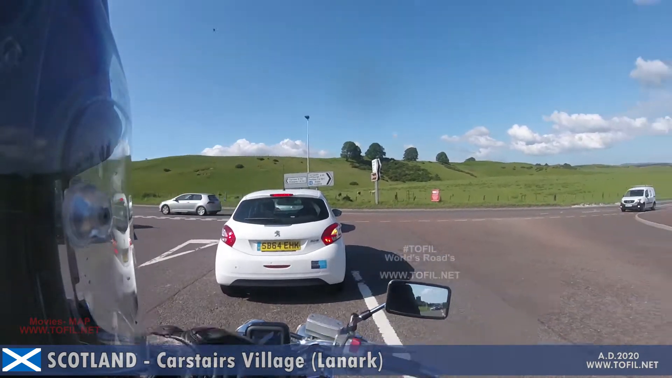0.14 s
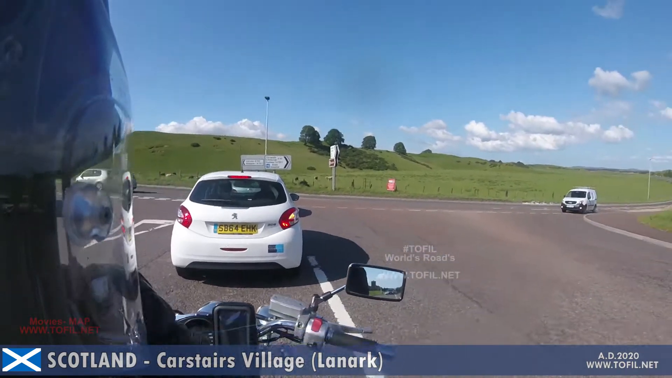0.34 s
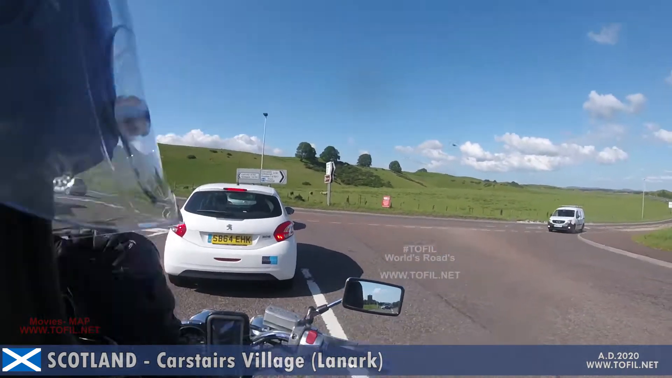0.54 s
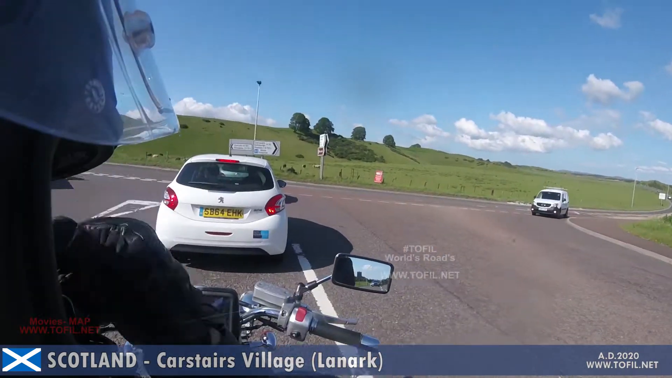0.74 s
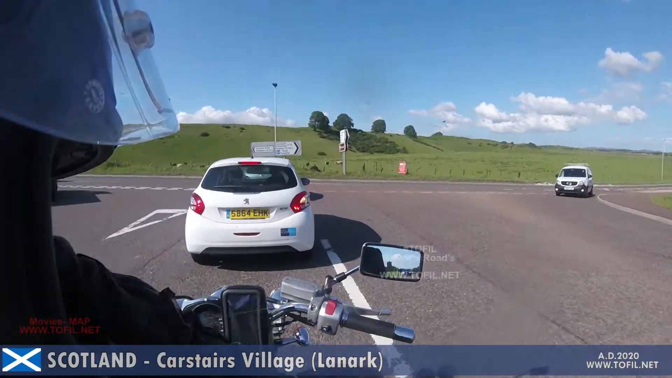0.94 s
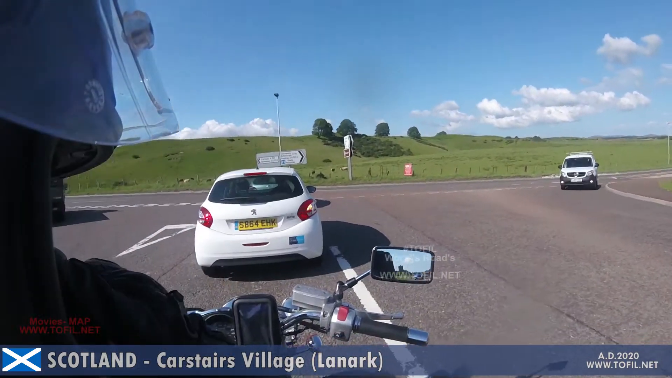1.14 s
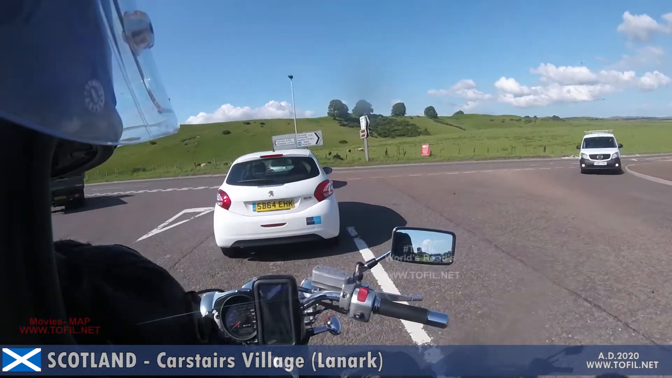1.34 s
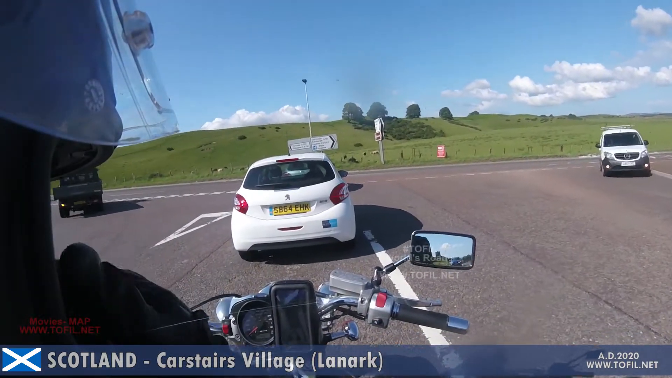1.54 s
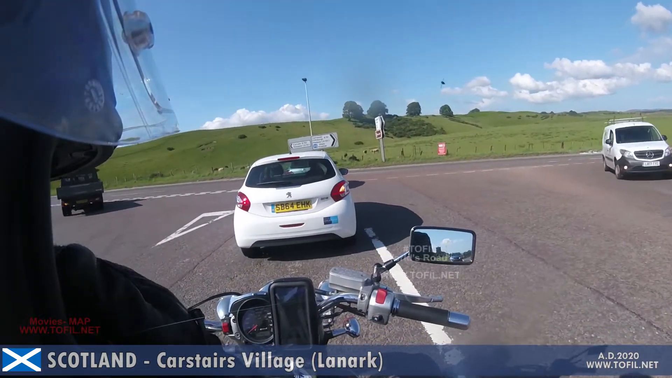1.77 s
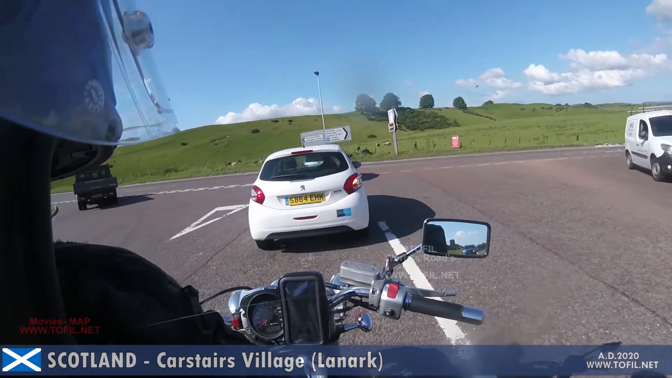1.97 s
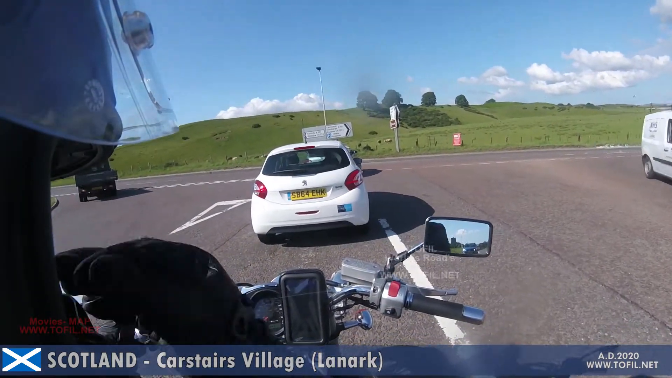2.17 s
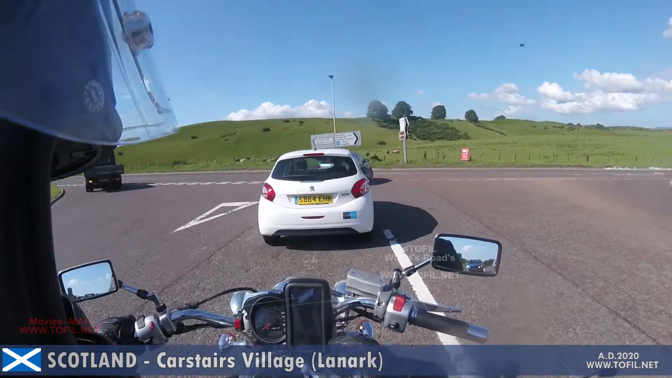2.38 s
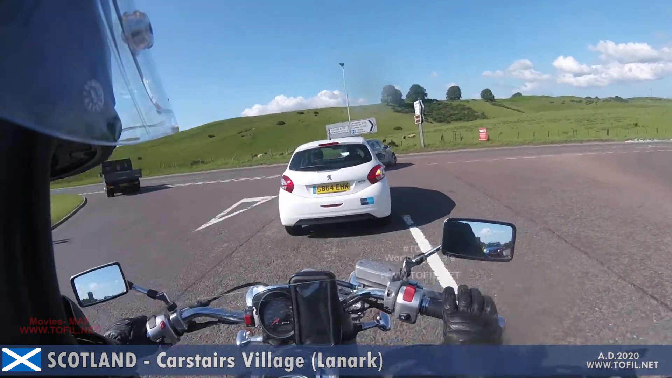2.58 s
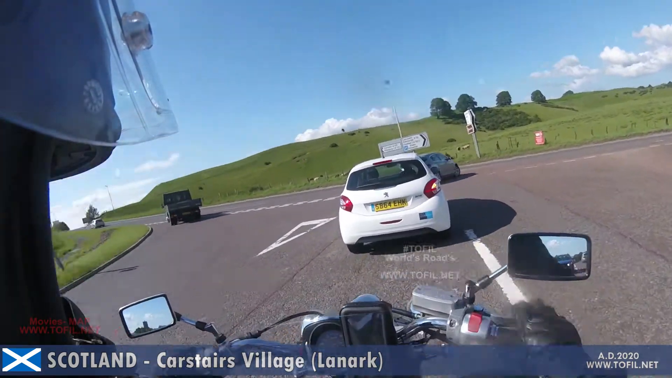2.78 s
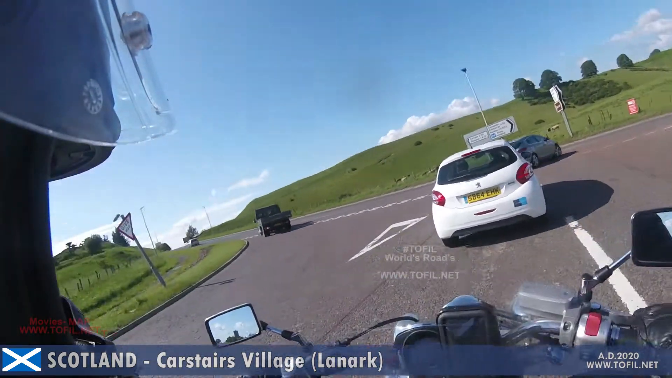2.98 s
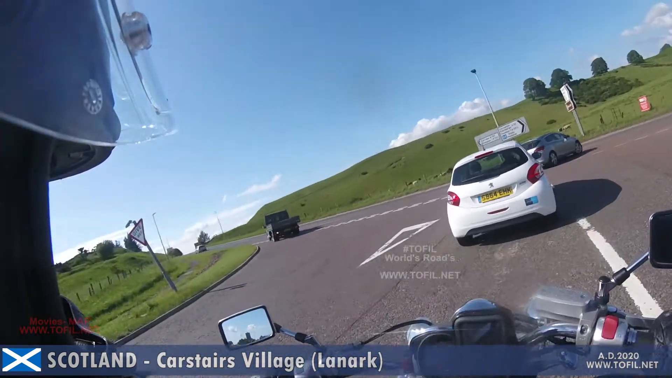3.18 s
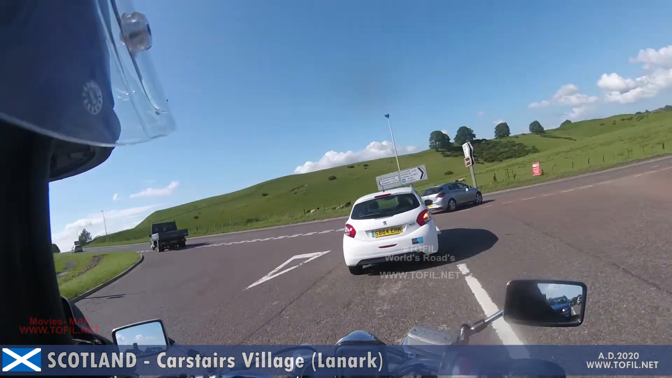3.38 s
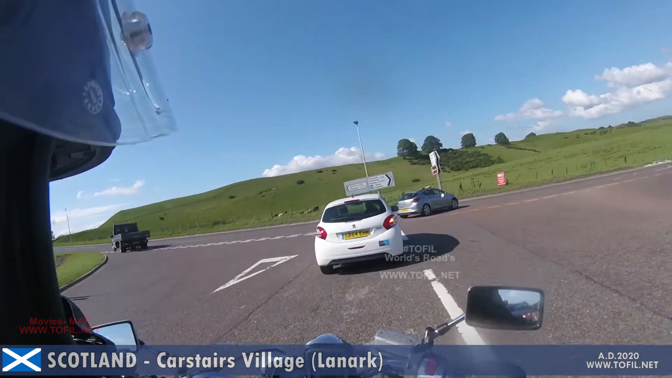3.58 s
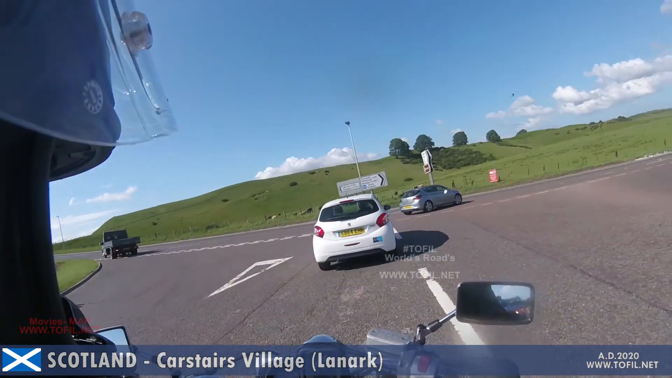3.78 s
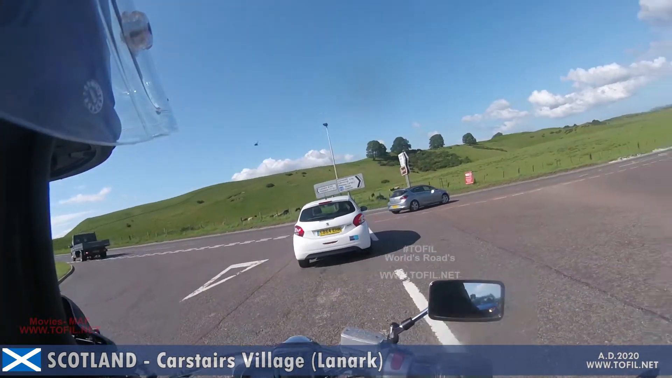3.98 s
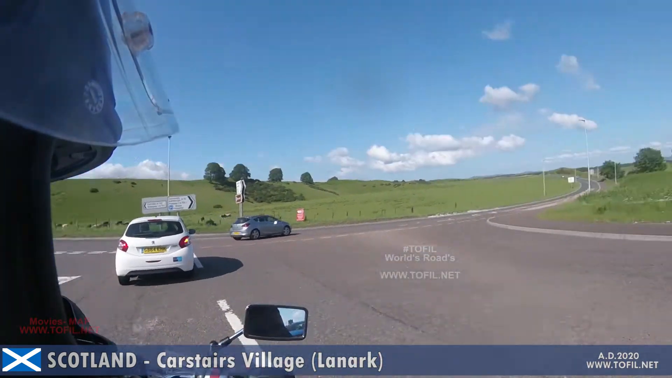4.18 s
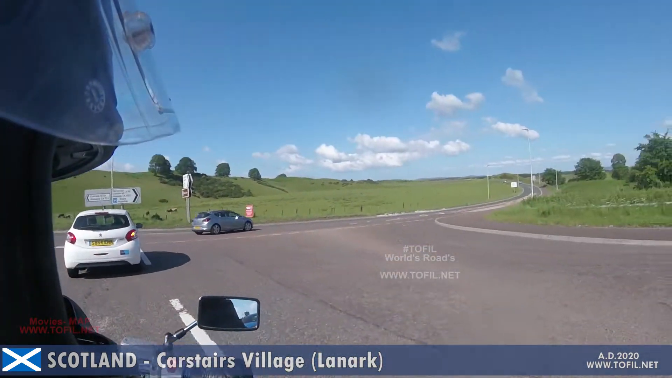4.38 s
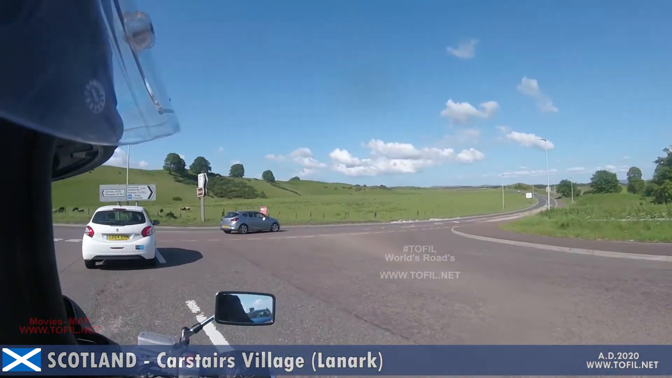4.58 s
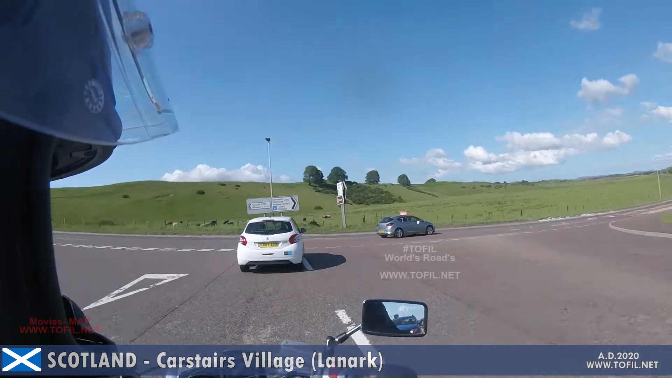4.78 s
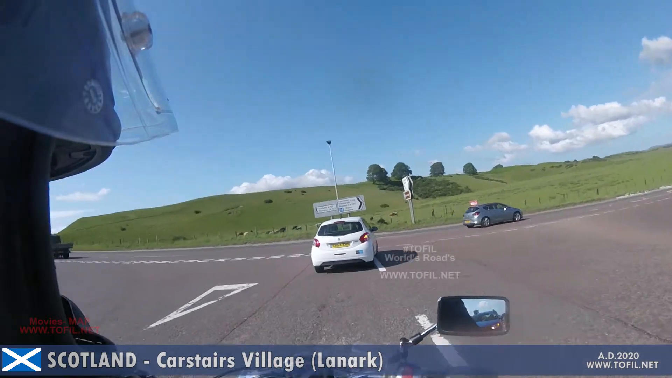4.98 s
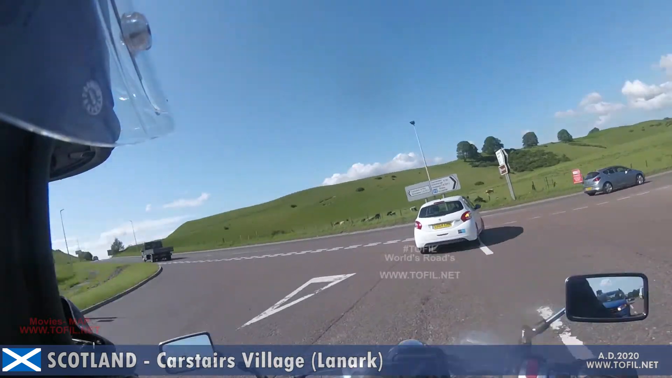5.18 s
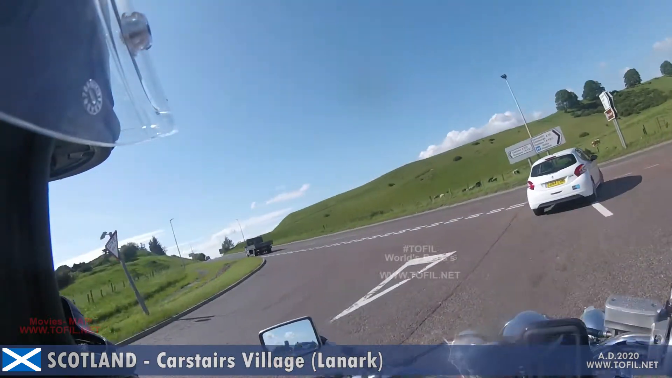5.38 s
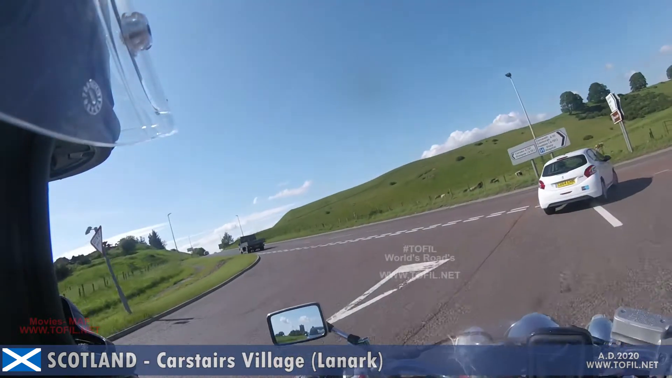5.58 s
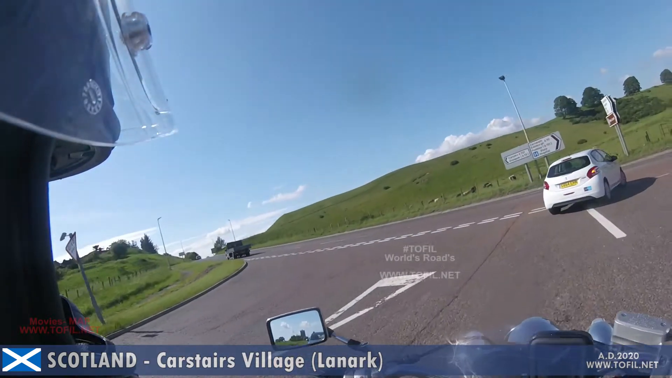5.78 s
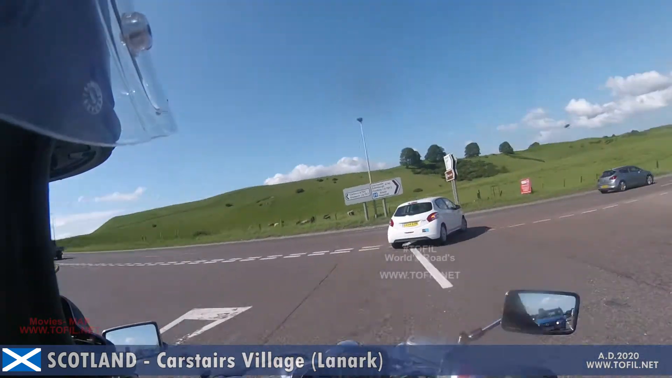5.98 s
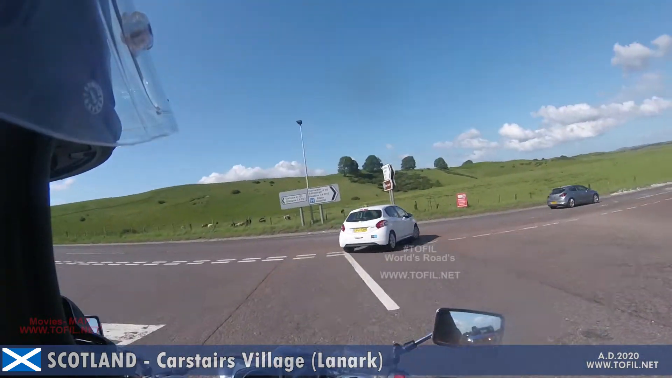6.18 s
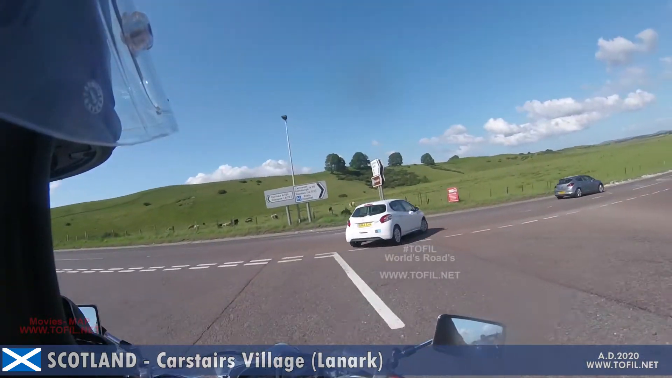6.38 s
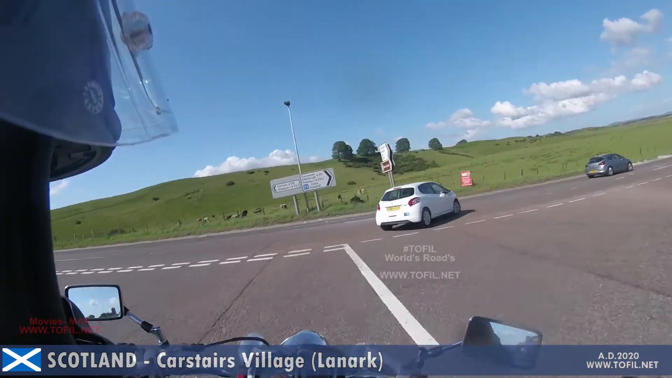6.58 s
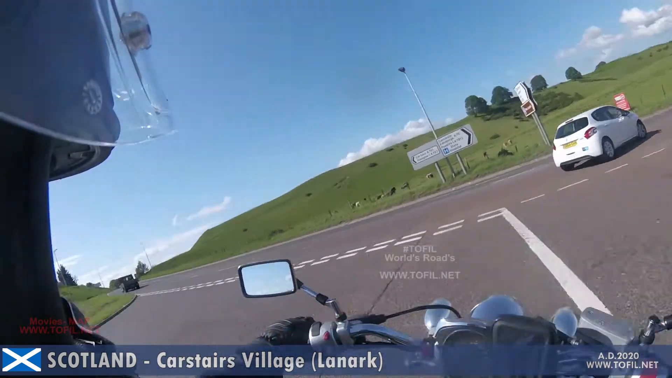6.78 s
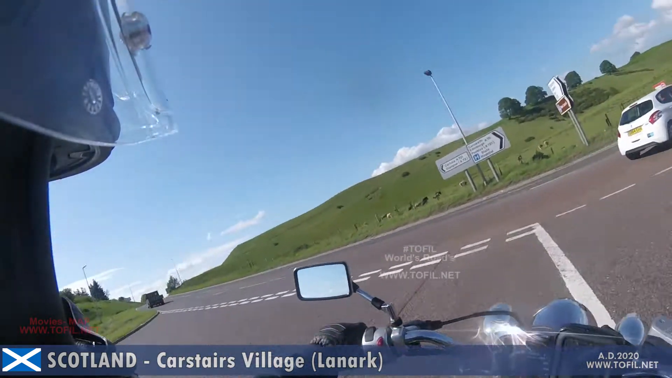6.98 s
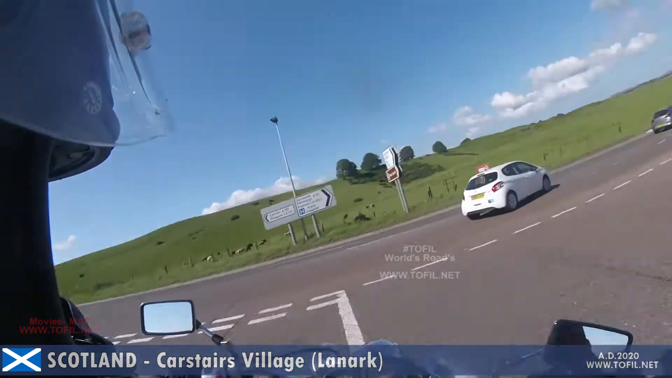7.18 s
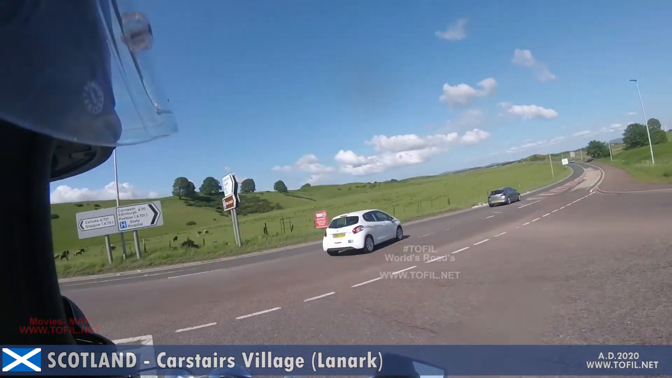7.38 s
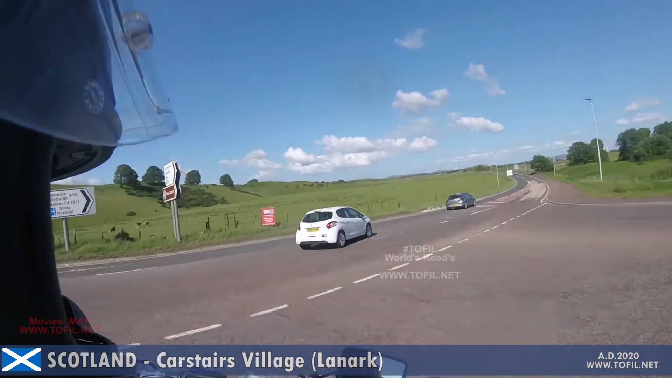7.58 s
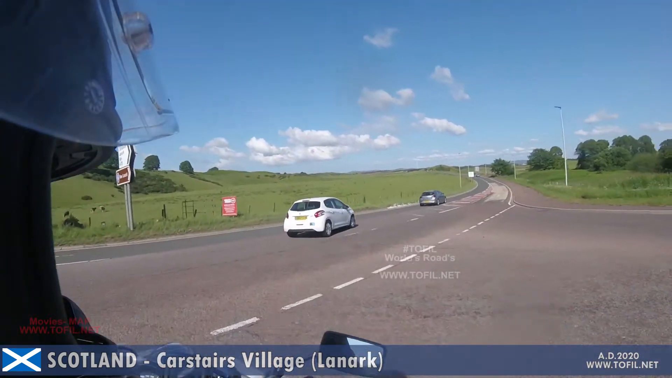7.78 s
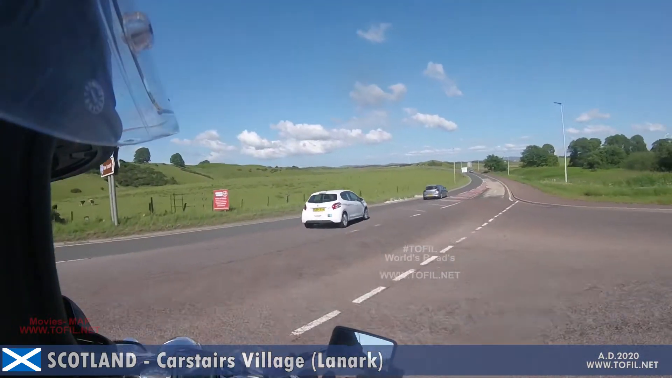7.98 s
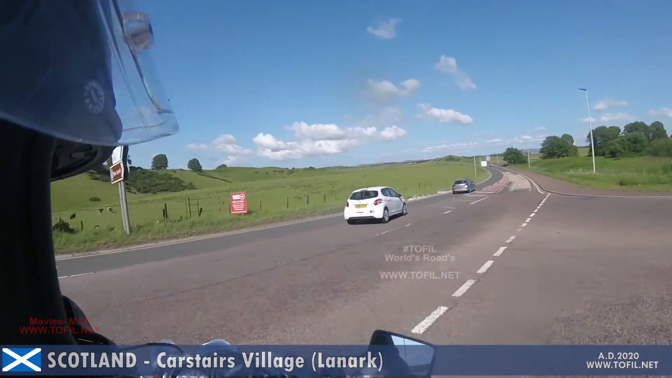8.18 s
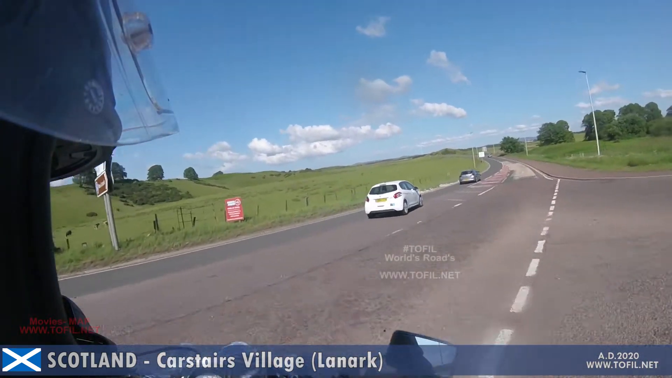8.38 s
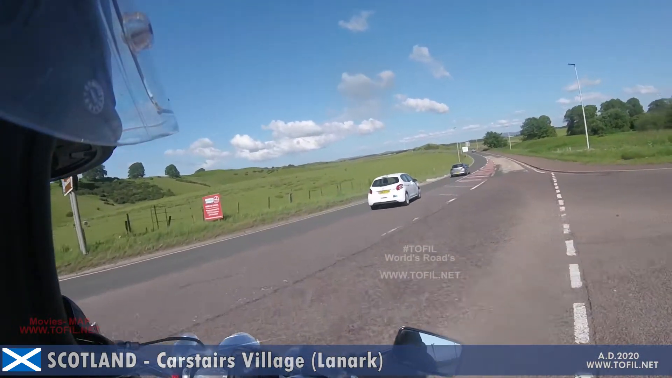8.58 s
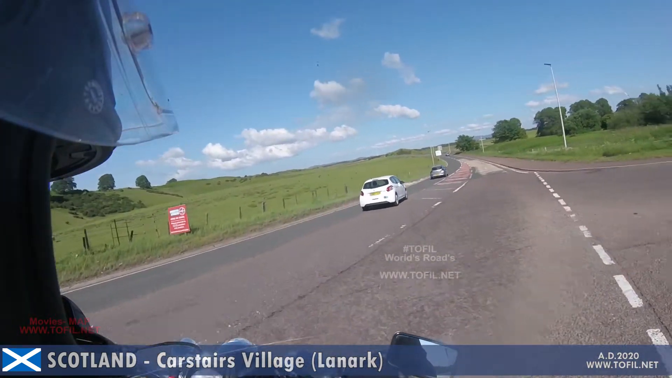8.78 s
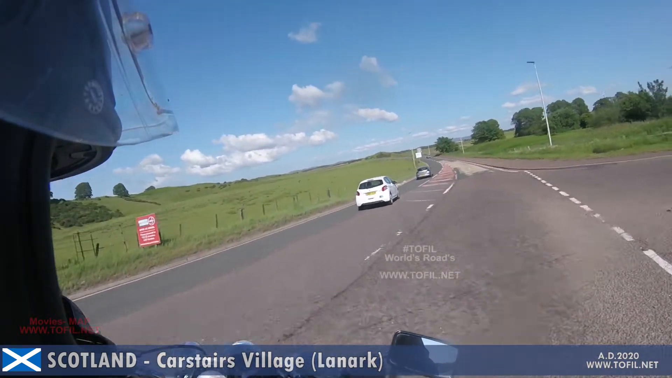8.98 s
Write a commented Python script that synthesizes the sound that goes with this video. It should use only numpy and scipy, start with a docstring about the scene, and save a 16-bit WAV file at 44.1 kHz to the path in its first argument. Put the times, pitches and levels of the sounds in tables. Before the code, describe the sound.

Close, boxed-in helmet microphone outdoors at a road junction: a V-twin motorcycle idles in uneven low thumps. Early hard cracks and heavy bumps make the engine suddenly sink and creep back. A van passes softly, a few handling knocks follow, the throttle blips, then revs climb with gear whine, drop and rise again amid wind buffeting and rattles.

```python
"""In a traffic queue: a V-twin motorcycle idles, blips and pulls away, heard by a boxed-in helmet microphone.
Engine: two uneven exhaust beats and an intake thud per cycle, as swelling rings, plus gas noise and gear whine.
Knocks: noise cracks, decaying shell tones, low bumps and clicks on helmet and mount.
Behind: shaped noise for wind, traffic wash, a passing van and hiss, and cavity-rung valve ticks.
Engine and surroundings sink at two moments, deeply then slightly, and creep back."""
import sys
import numpy as np
from scipy import signal
from scipy.io import wavfile
from scipy.ndimage import uniform_filter1d

SR = 44100
rng = np.random.default_rng(int(sys.argv[2]) if len(sys.argv) > 2 else 0)


def voltage_ratio(level):
    """Linear amplitude factor for a level in decibels (scalar or array-like)."""
    return 10 ** (np.asarray(level, float) / 20)


def digitize_waveform(pressure):
    """Quantize a signal to 16-bit integers and store it at the path in sys.argv[1].

    Rows of a 2-D input are taken as channels; values are limited to [-1, 1].
    """
    field = np.atleast_2d(pressure).T
    bounded = np.clip(field, -1, 1)
    quanta = np.round(bounded * 32767).astype(np.int16)
    wavfile.write(sys.argv[1], SR, quanta)


N = 398663

# engine speed, four-stroke cycles: time_s, speed_cycles_per_s
ENGINE_SPEED = [(0.0, 9.049), (0.88, 8.394), (1.4, 8.815), (2.12, 8.434), (2.44, 8.579), (3.4, 8.506),
                (3.96, 10.859), (4.44, 8.791), (5.04, 8.495), (5.38, 9.564), (6.91, 17.256), (7.04, 16.481),
                (7.36, 11.454), (7.53, 10.801), (7.72, 11.631), (8.5, 11.815), (9.04, 14.086)]
# front exhaust, rear exhaust, intake thud: crest_place_cycles, ring_hz (near 9 cycles/s), rise_s, fall_s,
# level_db, scatter_db
CYCLE_BEATS = [(-.348, 75, .0085, .0085, -3, 1.), (0, 103, .0075, .0062, 0, 1.),
               (.24, 78, .005, .0035, -10, 1.5)]
# engine load: time_s, exhaust_level_db, front_beat_offset_db
ENGINE_LOAD = [(0, -19.5, -0.5), (.9, -17.5, -1), (1.5, -16.5, -1), (2.4, -23, 1), (3.2, -22.5, -0.5),
               (3.6, -20.5, 2.5), (5.1, -20, 3.5), (5.8, -17.5, 1.5), (6.5, -19, 2.5), (6.9, -18.5, -1),
               (7.25, -23, -11), (7.5, -18.5, -12), (7.9, -18, 3), (8.2, -21.5, 2), (9.04, -17, -1.5)]
# microphone cavity resonances: centre_hz, width_hz, level_db
CAVITY_MODES = [(5130, 280, -3), (6596, 160, -5.5)]
# knocks on helmet and mount: start_s, crack_level_db, mount_ring_hz, thud_level_db, thud_centre_hz, crack_t60_s
KNOCK_EVENTS = [(0.5858, -10.5, 5040, -26, 457, 0.036), (.591, -31.5, 2210, -31, 450, .22),
                (.597, -27, 2000, -23, 510, 0.052), (0.6076, -17.5, 2240, -23, 286, 0.03),
                (0.623, -29, 2000, -24, 330, 0.046), (0.6453, -20, 4970, -35.5, 300, 0.044),
                (0.6512, -32, 2000, -28, 300, 0.07), (0.6836, -22, 5600, -36, 494, 0.027),
                (0.693, -36, 2000, -37, 400, 0.026), (2.2021, -41, 2000, -16.5, 336, 0.03),
                (2.986, -24, 6000, -36, 900, 0.085), (3.012, -50, 2000, -32, 900, 0.044),
                (4.117, -33, 2000, -24, 580, 0.028), (4.245, -39, 2000, -17.5, 464, 0.022),
                (4.348, -16.5, 5140, -13, 420, 0.015), (4.877, -34, 5030, -26.5, 600, 0.02),
                (5.1527, -26.5, 2500, -35, 600, 0.065), (6.115, -26, 2000, -22, 600, 0.025),
                (6.4877, -21.5, 1790, -36.5, 600, .04), (6.62, -16.5, 3180, -25, 900, 0.044),
                (6.652, -35, 1200, -23.5, 795, 0.043), (7.0466, -14.5, 5220, -31.5, 970, 0.075),
                (7.2155, -11.5, 1980, -37, 1100, 0.086), (7.272, -12, 6400, -31, 755, 0.064),
                (7.3235, -19.5, 5200, -12.5, 473, 0.028), (7.325, -30, 1800, -19, 1510, 0.024),
                (7.7172, -32, 1800, -11, 488, 0.016), (8.18, -45, 2000, -25.5, 600, 0.03),
                (8.937, -34, 3000, -25, 800, .018), (8.987, -40, 2000, -22, 620, .018)]
# heavy bumps through the body: start_s, level_db, pitch_hz, t60_s
BUMP_EVENTS = [(.571, -11.5, 118.5, 0.21), (0.6019, -3, 111.5, 0.15), (0.648, -5, 122, 0.067),
               (2.172, -10, 101, 0.13), (2.203, -9, 118, 0.17), (2.246, -11, 75, 0.045),
               (4.341, -1.5, 97.5, 0.1), (6.497, -1.5, 101, 0.1), (7.334, -12.5, 108.7, 0.34),
               (7.41, -7.5, 70, 0.2), (8.942, -25, 119, 0.14)]
# crack noise spectrum: frequency_hz, density_db_per_hz
CRACK_SPECTRUM = [(530, -20), (900, -3), (1270, -10.5), (2110, -1.5), (2680, -15), (3300, -9.5),
                  (4030, -17.5), (4910, -10), (5480, -11.5), (6450, -9.5), (7880, -19), (10200, -33),
                  (17300, -120)]
# helmet shell modes: pitch_hz, level_db, thud_t60_share
SHELL_MODES = [(210, 19, 0.77), (258, -1, 1.4), (330, 4.5, 1.08), (415, 0.5, 0.7), (473, 7, 0.37),
               (600, 3.5, 0.89), (682, 3.5, 0.54), (902, 7.5, 0.51), (1144, 7.5, 0.57), (1870, 1.5, 0.53),
               (2130, -12, 0.74)]
# dry ticks of strap or visor: start_s, level_db, top_hz
TICK_EVENTS = [(.5125, -31, 9150), (0.5448, -27.5, 9000), (4.3485, -24, 1500), (4.877, -28, 1800),
               (6.1155, -26.5, 1400), (6.383, -30, 1300), (6.448, -30, 1300), (6.461, -27, 1300),
               (6.655, -20.5, 1300), (6.6595, -21, 1300), (6.722, -30, 1300), (8.895, -28, 1210),
               (8.917, -27, 1300), (8.9565, -19, 1400), (8.968, -25.5, 1100), (8.9762, -20.5, 1700)]
# traffic and road wash; valve-gear and air hiss: time_s, wash_level_db, hiss_level_db
SURROUNDING_LEVELS = [(0, -32, -42), (.5, -33.5, -46), (1, -32.5, -46.5), (2.4, -34, -47), (3.2, -31, -47),
                      (4.2, -34.5, -47), (4.55, -35.5, -50), (5.3, -37, -45.5), (5.9, -34.5, -43),
                      (6.35, -35, -45), (6.9, -33.5, -40), (7.1, -37, -41.5), (7.5, -35, -44.5),
                      (8.2, -36, -48.5), (8.8, -38, -47), (8.95, -31, -44.5), (9.04, -35, -45)]
# gusts on the helmet: peak_s, half_width_s (1/e amplitude), buffet_level_db, roar_level_db
GUST_EVENTS = [(.02, 0.065, -28.5, -50), (.28, 0.13, -23, -57), (.63, 0.056, -32, -29),
               (.85, 0.39, -23.5, -64), (1.8, 0.52, -31, -42), (2.25, 0.19, -22.5, -43),
               (2.95, 0.28, -27.5, -53), (4.2, 0.2, -36, -40), (5.17, 0.23, -24, -51),
               (6.2, 0.15, -20, -40.5), (6.32, .07, -35, -34), (6.5, 0.2, -24, -30),
               (7.05, 0.15, -19.5, -38), (7.25, 0.12, -19.5, -34.5), (7.43, 0.1, -17.5, -35),
               (7.55, 0.035, -35, -31), (7.8, 0.53, -28, -38.5), (8.75, 0.27, -26, -45),
               (8.88, 0.02, -13.5, -39), (8.97, 0.037, -35, -32), (9.04, 0.021, -41, -26.5)]
# wind buffet spectrum: frequency_hz, density_db_per_hz
BUFFET_SPECTRUM = [(12, -19.5), (25, 1), (40, 3), (60, -9), (130, -11.5), (260, -22.5), (400, -33.5),
                   (800, -51.5), (2000, -100)]
# tearing wind roar spectrum: frequency_hz, density_db_per_hz
ROAR_SPECTRUM = [(150, -26.5), (250, -4.5), (400, 3.5), (650, -3.5), (1000, -24), (1600, -32),
                 (3000, -48.5), (6000, -100)]
# traffic wash spectrum: frequency_hz, density_db_per_hz
WASH_SPECTRUM = [(100, -20), (170, 7), (199, -13), (278, 3), (365, -10.5), (514, -7.5), (850, -9.5),
                 (1030, -7.5), (1520, -20), (2600, -40), (3380, -47.5), (5720, -120)]
# van tyre hiss spectrum: frequency_hz, density_db_per_hz
TYRE_SPECTRUM = [(1000, -27.5), (1500, -2), (2100, 5.5), (2700, -1.5), (3500, -14), (6000, -55),
                 (12000, -110)]
# air and valve-gear hiss spectrum: frequency_hz, density_db_per_hz
HISS_SPECTRUM = [(900, -15), (1500, 1), (2050, 1), (2600, -2.5), (3400, -5.5), (4300, -10), (5150, -3),
                 (6000, -4), (6600, -7), (7200, -13), (8000, -16), (9300, -22.5), (10500, -28.5),
                 (12000, -31.5), (13200, -41), (14000, -55.5), (17000, -94)]
# level dips: start_s, depth_db
LEVEL_SINKS = [(0.54, -12.5), (7.705, -2.5)]

START_CYCLES = .12  # cycle position at 0 s, from the rear beat's crest
IDLE_CYCLES_PER_S = 8.5
GAS_DB_PER_SPEED = 0.59  # dB per cycle/s above idle, over the beats
WHINE_ORDER = 84.5  # whine periods per engine cycle
# at idle; per cycle/s above idle; per cycle/s^2 of pull
WHINE_DB, WHINE_DB_PER_SPEED, WHINE_DB_PER_PULL = -73, 3.1, .3
MOUNT_RING_WIDTH_HZ, MOUNT_RING_DB = 800, -5  # ring level over the crack noise
CRACK_RISE_PER_T60 = .03
THUD_T60_PER_CRACK_T60 = 1.7
BREEZE_BUFFET_DB, BREEZE_ROAR_DB = -29.5, -49
VAN_DB, VAN_CLOSEST_S, VAN_PASS_S = -50.5, 2.33, .55  # level at closest, when, time scale
SINK_FALL_S, SINK_HOLD_S, CREEP_DB_PER_S = 0.012, 0.33, 8


def evened(x):
    """Scales to rms 1."""
    return x / np.sqrt(np.mean(x ** 2) + 1e-20)


def curves(rows):
    """Interpolates every table column at each sample."""
    time_s, *columns = np.transpose(rows)
    return [np.interp(np.arange(N) / SR, time_s, column) for column in columns]


def add(mix, start_s, sound):
    """Mixes a sound in at start_s."""
    part = mix[max(round(start_s * SR), 0):][:len(sound)]
    part += sound[:len(part)]


def resonate(x, hz, width_hz):
    """Resonator: shifts hz (constant or curve) to zero, smooths, shifts back."""
    turn = np.exp(2j * np.pi * np.cumsum(hz * np.ones(len(x))) / SR)
    r = np.exp(-np.pi * width_hz / SR)
    return 2 * (turn * signal.lfilter([1 - r], [1, -r], x / turn)).real


def noise(spectrum, size, patchy_db, flicker_db, wide=8, long=6):
    """Random short-time spectra with drifting patches and a flicker shared by all bands."""
    frames, hz = 4 * N // size + 5, np.fft.rfftfreq(size, 1 / SR)
    real, imag, patches = rng.standard_normal((frames, len(hz), 3)).T
    patches = uniform_filter1d(patches, int(wide), 0)
    patches = evened(uniform_filter1d(patches, int(long), 1))
    flicker = evened(uniform_filter1d(rng.standard_normal(frames), 3))
    table_hz, table_db = np.transpose(spectrum)
    shape_db = np.interp(np.log(hz + 1), np.log(table_hz + 1), table_db)[:, None]
    shape_db = shape_db + patchy_db * patches + flicker_db * flicker
    bins = (real + 1j * imag) * voltage_ratio(shape_db)
    return evened(signal.istft(bins, nperseg=size, noverlap=3 * size // 4)[1][:N])


def beat_ring(hz, rise_s, fall_s):
    """A suck then a push: tone swells and dies in a few cycles, rising in pitch; crest 30 ms in."""
    t = np.arange(round(.12 * SR)) / SR - .03
    u = t + .28 / hz  # strongest just before the crest
    shape = np.where(u < 0, np.exp(-(u / rise_s) ** 2), 1 / np.cosh(u / fall_s))
    return shape * np.cos(2 * np.pi * hz * t * (1 + 2.5 * np.clip(t, -.02, .02)))


def beats_and_puffs(speed, front_db):
    """Each beat rings at its place in the cycle, higher with speed; a gas puff rides on it."""
    cycles = START_CYCLES + np.cumsum(speed) / SR
    beats, puffs = np.zeros((2, N))
    for k, (place, hz, rise_s, fall_s, level_db, scatter_db) in enumerate(CYCLE_BEATS):
        front = k == 0
        crests = np.flatnonzero(np.diff(np.floor(cycles - place)))
        chance = rng.standard_normal((len(crests), 3))
        for at, (strong, pitch, late) in zip(crests, chance):
            ring_hz = hz * (1 + .02 * pitch) * (speed[at] / 9) ** (0.057 + 0.22 * front)
            gain = voltage_ratio(level_db + scatter_db * strong + front * front_db[at])
            crest_s = at / SR + 0.00021 * late
            add(beats, crest_s - .03, gain * beat_ring(ring_hz, rise_s, fall_s))
            add(puffs, crest_s - .01, gain * signal.windows.hann(round(0.031 * SR)))
    return beats, puffs


def gear_whine(speed):
    """Gear mesh: noise through two narrow resonators tracking engine speed."""
    pull = uniform_filter1d(np.gradient(speed) * SR, size=8000)  # cycles/s^2
    whine_db = WHINE_DB + WHINE_DB_PER_SPEED * (speed - IDLE_CYCLES_PER_S) + WHINE_DB_PER_PULL * pull
    mesh_hz = WHINE_ORDER * speed
    whine = resonate(resonate(rng.standard_normal(N), mesh_hz, 45), mesh_hz, 100)
    return voltage_ratio(whine_db) * evened(whine)


def engine():
    """Cycle beats carry gas noise that grows with speed; the gear whine adds to them."""
    speed, = curves(ENGINE_SPEED)
    level_db, front_db = curves(ENGINE_LOAD)
    beats, puffs = beats_and_puffs(speed, front_db)
    gas = resonate(resonate(rng.standard_normal(N), 242, 120), 242, 120)
    gas_gain = voltage_ratio(-22 + GAS_DB_PER_SPEED * (speed - IDLE_CYCLES_PER_S))
    exhaust = evened(beats) + gas_gain * evened(gas * (.5 + puffs))
    return voltage_ratio(level_db) * exhaust + gear_whine(speed)


def valve_gear():
    """Small irregular ticks, denser with engine speed, ring the microphone cavity."""
    speed, = curves(ENGINE_SPEED)
    heights = voltage_ratio(2.9 * np.minimum(rng.exponential(1, N), 4))
    impulses = (rng.random(N) < 30 * speed / SR) * heights
    bursts = signal.lfilter([1], [1, -.97], impulses) * rng.standard_normal(N)
    modes = [voltage_ratio(db) * evened(resonate(resonate(bursts, hz, 2 * width_hz), hz, width_hz))
             for hz, width_hz, db in CAVITY_MODES]
    return evened(sum(modes))


def knocks():
    """Cracks ring the mount; thuds excite shell modes near their centre frequency."""
    out, t = np.zeros(N), np.arange(SR // 3) / SR
    grit = noise(CRACK_SPECTRUM, size=256, patchy_db=1, flicker_db=.5)
    band = signal.butter(4, (700, 5000), "band", fs=SR, output="sos")
    click = signal.sosfilt(band, signal.unit_impulse(400))  # first contact of two hard faces
    for start_s, crack_db, ring_hz, thud_db, centre_hz, crack_t60_s in KNOCK_EVENTS:
        burst = grit[round(start_s * SR):][:len(t)]
        mount = resonate(burst, ring_hz, MOUNT_RING_WIDTH_HZ)
        mount = resonate(mount, ring_hz, 2 * MOUNT_RING_WIDTH_HZ)
        burst = burst + voltage_ratio(MOUNT_RING_DB) * evened(mount)
        snap = voltage_ratio(-60 * t / crack_t60_s) + .8 * voltage_ratio(-60 * t / 0.011)  # rattle + sharp edge
        snap = snap * np.minimum(t / (CRACK_RISE_PER_T60 * crack_t60_s), 1)
        add(out, start_s, voltage_ratio(crack_db - 15) * snap[:len(burst)] * burst)
        click_gain = voltage_ratio(crack_db - 260 * crack_t60_s)  # short cracks start harder
        add(out, start_s + 0.001064, -click_gain * click / click.max())
        for (hz, mode_db, share), phase in zip(SHELL_MODES, rng.random(len(SHELL_MODES))):
            near_db = mode_db - 18 * np.log2(hz / centre_hz) ** 2
            thud_t60_s = share * THUD_T60_PER_CRACK_T60 * crack_t60_s
            fade = voltage_ratio(thud_db - 4 + near_db - 60 * t / thud_t60_s) * np.minimum(t / .002, 1)
            add(out, start_s, fade * np.sin(2 * np.pi * (hz * t + phase)))
    return out


def bumps():
    """Body-borne bumps: low decaying sines with a short rise."""
    out, t = np.zeros(N), np.arange(SR // 3) / SR
    for start_s, level_db, hz, t60_s in BUMP_EVENTS:
        fade = voltage_ratio(level_db - 60 * t / t60_s) * np.minimum(t / 0.0069, 1)
        add(out, start_s, -fade * np.sin(2 * np.pi * hz * t))
    return out


def ticks():
    """Strap or visor: single band-passed impulses, without bass, dulled above top_hz."""
    out = np.zeros(N)
    for start_s, level_db, top_hz in TICK_EVENTS:
        band = signal.butter(3, (350, min(top_hz, 15000)), "band", fs=SR, output="sos")
        click = signal.sosfilt(band, signal.unit_impulse(600))
        add(out, start_s, -voltage_ratio(level_db) * click / click.max())
    return out


def gusts():
    """Buffet and roar gains: steady breeze plus bell-shaped gusts, summed as powers."""
    t = np.arange(N) / SR
    buffet_power, roar_power = np.ones((2, N)) * voltage_ratio([[BREEZE_BUFFET_DB], [BREEZE_ROAR_DB]]) ** 2
    for peak_s, half_s, buffet_db, roar_db in GUST_EVENTS:
        bell = np.exp(-2 * ((t - peak_s) / half_s) ** 2)
        buffet_power = buffet_power + voltage_ratio(buffet_db) ** 2 * bell
        roar_power = roar_power + voltage_ratio(roar_db) ** 2 * bell
    return np.sqrt(buffet_power), np.sqrt(roar_power)


def wind():
    """Turbulence: lumpy low buffet, and roar slapped by densely shed eddies."""
    buffet_gain, roar_gain = gusts()
    buffet = noise(BUFFET_SPECTRUM, size=2048, patchy_db=1.5, flicker_db=1.2, wide=4, long=6)
    eddies = (rng.random(N) < 300 / SR) * rng.exponential(1, N)
    slaps = .8 + evened(signal.oaconvolve(eddies, signal.windows.hann(400))[:N])
    roar = noise(ROAR_SPECTRUM, size=256, patchy_db=2, flicker_db=1.2, wide=3, long=4)
    return buffet_gain * buffet + roar_gain * evened(slaps * roar)


def van():
    """Tyre hiss of a van crossing ahead, amplitude as 1 / distance."""
    distance = np.hypot(1, (np.arange(N) / SR - VAN_CLOSEST_S) / VAN_PASS_S)
    return voltage_ratio(VAN_DB) / distance * noise(TYRE_SPECTRUM, size=512, patchy_db=-3.0, flicker_db=-0.5)


def surroundings():
    """Wind, traffic wash and van, and hiss with valve ticks in it."""
    wash_db, hiss_db = curves(SURROUNDING_LEVELS)
    wash = voltage_ratio(wash_db) * noise(WASH_SPECTRUM, size=1024, patchy_db=1.0, flicker_db=0.37)
    hiss = noise(HISS_SPECTRUM, size=256, patchy_db=1.42, flicker_db=0.32) + voltage_ratio(-15.5) * valve_gear()
    return wind() + wash + van() + voltage_ratio(hiss_db) * hiss


def sinking_db():
    """Each dip falls fast, holds, and creeps back at a steady dB rate."""
    t, total_db = np.arange(N) / SR, np.zeros(N)
    for start_s, depth_db in LEVEL_SINKS:
        corners_s = np.cumsum([0, SINK_FALL_S, SINK_HOLD_S, -depth_db / CREEP_DB_PER_S])
        total_db += np.interp(t - start_s, corners_s, [0, depth_db, depth_db, 0])
    return total_db


def scene():
    """One microphone; dips act on engine and surroundings, not on knocks, bumps and ticks."""
    steady = voltage_ratio(sinking_db()) * (engine() + surroundings())
    return (steady + knocks() + bumps() + ticks())[None]


def band_limit(x):
    """A steep low-pass at the top of the band."""
    return signal.sosfilt(signal.butter(12, 14000, fs=SR, output="sos"), x)


def record(dry):
    """Narrow cavity peak, preamp rounding tall peaks, first-order bass cut at 12 Hz."""
    boxed = dry[0] + .8 * resonate(dry[0], 6480, 230)
    rounded = np.tanh(boxed)
    finished = signal.sosfilt(signal.butter(1, 12, "high", fs=SR, output="sos"), rounded)
    return band_limit(finished[None])


dry = scene()
out = record(dry)
digitize_waveform(out)
```